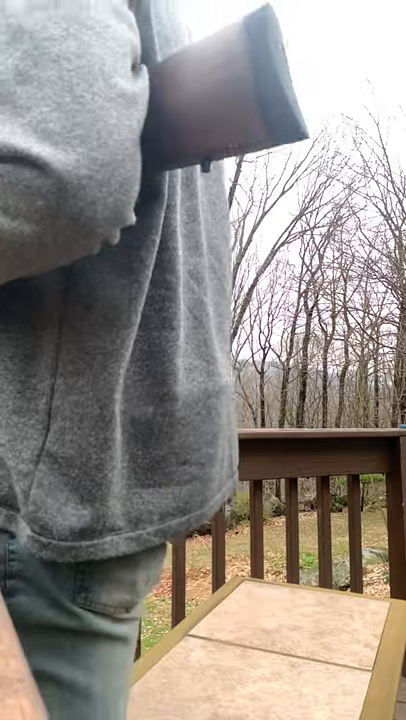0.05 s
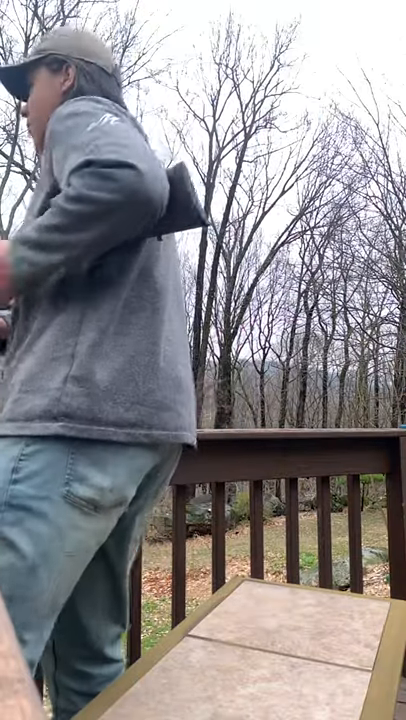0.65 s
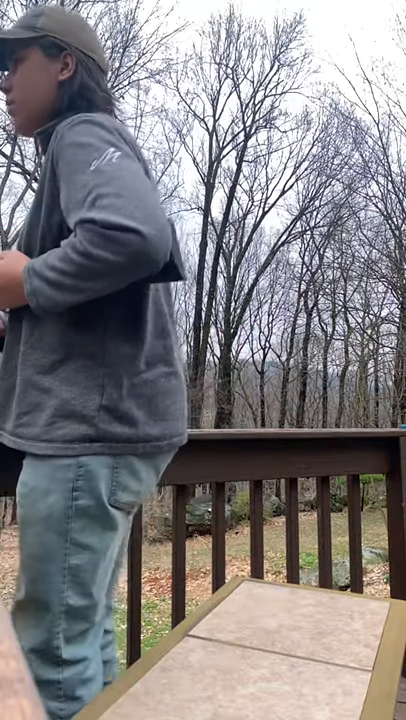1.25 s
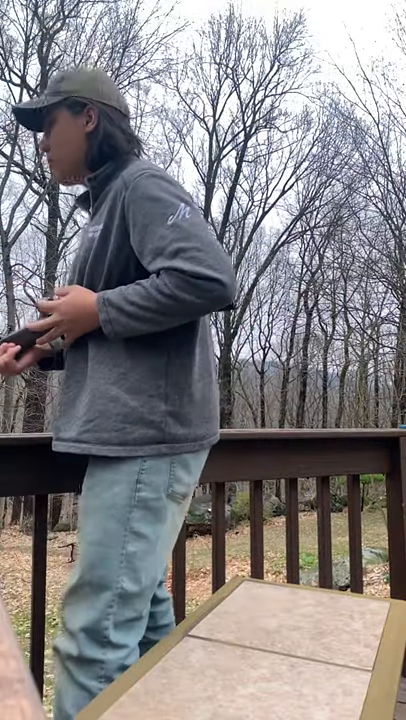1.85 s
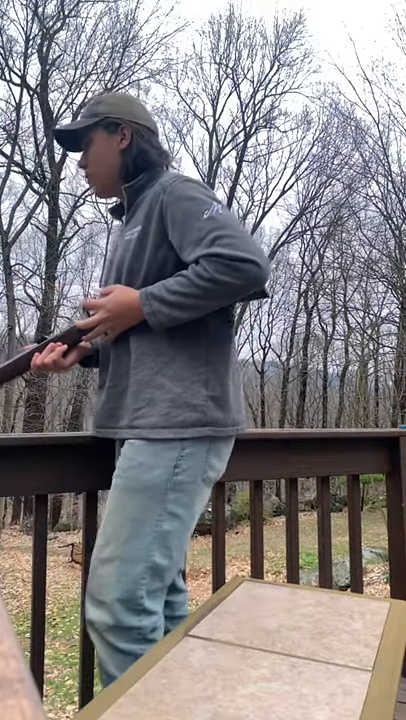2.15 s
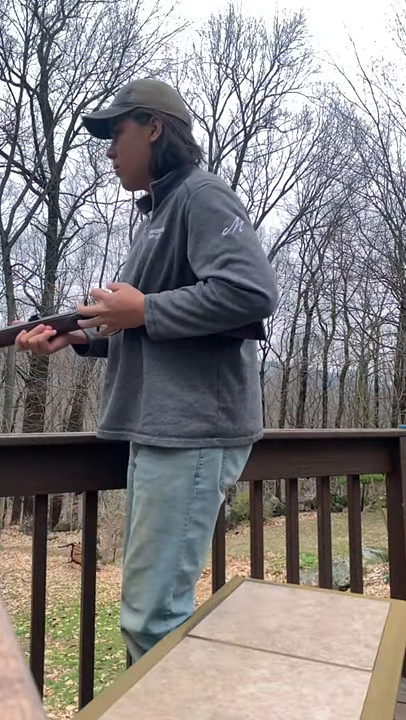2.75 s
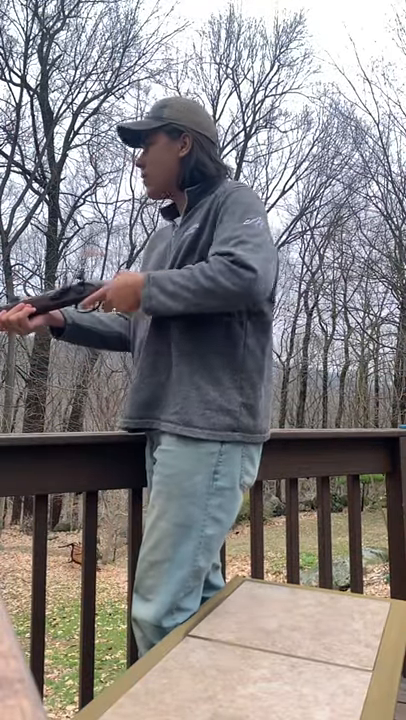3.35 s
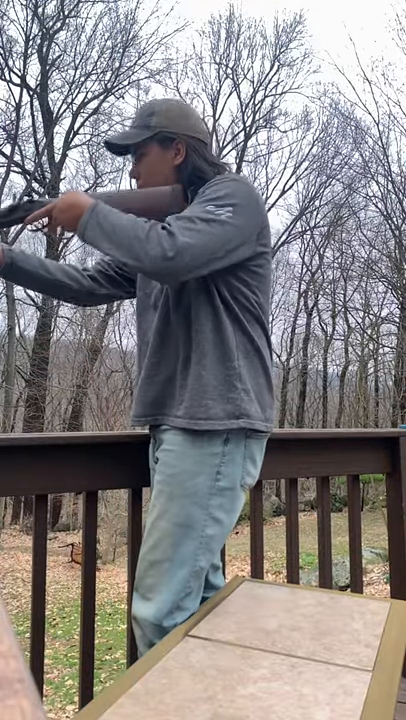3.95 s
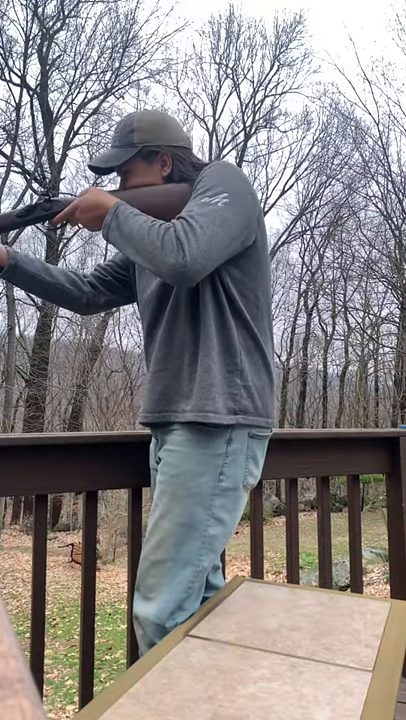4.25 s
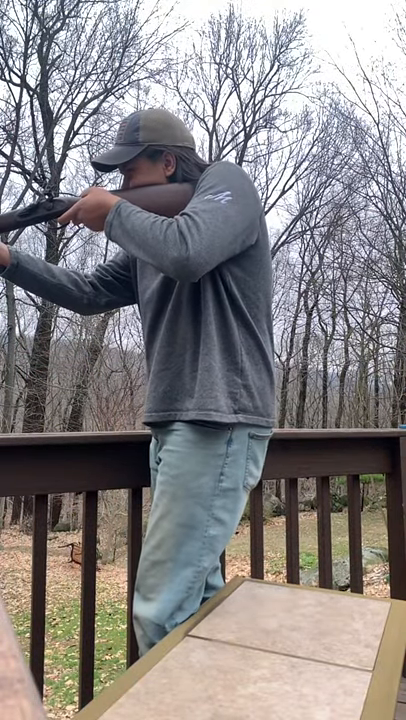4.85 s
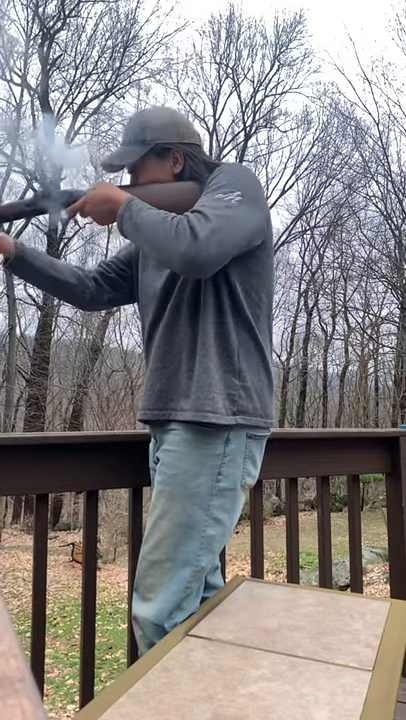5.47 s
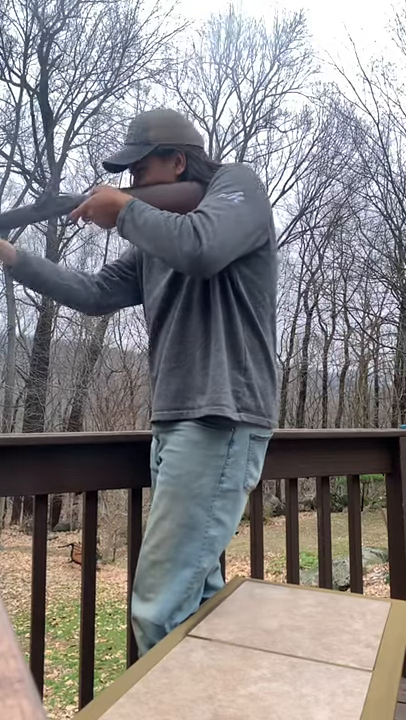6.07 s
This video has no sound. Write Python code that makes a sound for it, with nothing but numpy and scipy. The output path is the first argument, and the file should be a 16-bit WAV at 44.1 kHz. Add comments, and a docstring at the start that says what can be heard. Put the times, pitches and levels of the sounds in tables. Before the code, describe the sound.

A flintlock rifle is cocked and fired close by outdoors, its blast echoing off trees, after light wind and footsteps on boards.

```python
"""First, light wind thumps the microphone and steps cross a wooden deck, with cloth rubbing and a far hum.
Then a flintlock rifle clicks as it is cocked, slides into the shoulder and is fired close to a phone.
Flint strikes steel, a pinch of priming powder fizzes for a tenth of a second, gas roars from a small
hole in the barrel and the main charge bangs. The deck booms and bare woods scatter the shot back."""
import sys
import numpy as np
from scipy import signal
from scipy.fft import rfft, irfft, next_fast_len
from scipy.io import wavfile
from scipy.ndimage import uniform_filter1d, map_coordinates

SR = 44100
rng = np.random.default_rng(int(sys.argv[2]) if len(sys.argv) > 2 else 0)


def output_pcm(signal):
    """Save a mono or channel-first signal as 16-bit PCM at the path in sys.argv[1].

    Samples are clipped to [-1, 1] before scaling.
    """
    pcm = np.clip(np.atleast_2d(signal).T, -1, 1) * 32767
    wavfile.write(sys.argv[1], SR, np.round(pcm).astype(np.int16))


N = 273861
NOW = np.arange(N) / SR
HALF_SECOND = SR // 2
TOP_HZ = 15950  # where the treble ends


def amp(db):
    """Turn decibels into a number to multiply by."""
    return 10 ** (np.asarray(db) / 20)


def unit(x):
    """Scale x to an average strength (rms) of 1."""
    return x / np.sqrt(np.mean(x ** 2) + 1e-20)


def along(points, hz):
    """Read between (frequency [Hz], value) points, with octaves evenly spaced."""
    freqs, values = np.transpose(points)
    return np.interp(np.log(hz + 1), np.log(freqs + 1), values)


def wobble(rate):
    """A smooth curve through `rate` random values a second."""
    return map_coordinates(rng.standard_normal(int(N * rate / SR) + 4), [NOW * rate])


def swell(s, db, rise_s, fall_s, hold_s=0):
    """Loudness that climbs 20 dB per rise time to its level at s, holds, then drops 20 dB per fall time."""
    below = np.maximum((s - NOW) / rise_s, (NOW - s - hold_s) / fall_s)
    return amp(db - 20 * np.maximum(below, 0))


def burst(fade_s, attack_s):
    """Half a second of loudness that jumps up, then drops 60 dB per fade time."""
    t = NOW[:HALF_SECOND]
    return amp(-60 * t / fade_s) * (1 - np.exp(-t / attack_s))


def filtered(x, response):
    """Scale and shift each frequency in x by response(hz)."""
    n = x.shape[-1]
    padded = next_fast_len(n + SR // 5)
    return irfft(rfft(x, padded) * response(np.fft.rfftfreq(padded, 1 / SR)), padded)[..., :n]


def noise(colour, size=N, dull_db=0):
    """Two unrelated noises with the bass-to-treble balance `colour`, darkened by dull_db per octave."""
    def gain(hz):
        level_db = along(colour, hz) - dull_db * np.log2(1 + hz / 1000)
        return amp(level_db) / (1 + (hz / TOP_HZ) ** 80)
    return unit(filtered(rng.standard_normal((2, size)), gain))


def resonant(peaks, size=N):
    """Two unrelated noises coloured by the notes an object likes to ring at."""
    def body(hz):
        return sum((-1) ** k * amp(db) * 1j * hz * width / (pitch ** 2 - hz ** 2 + 1j * hz * width)
                   for k, (pitch, width, db) in enumerate(peaks))
    return unit(filtered(rng.standard_normal((2, size)), body))


def ring(notes, attack_s):
    """A pair of signals made of fading notes, a little different at every hit."""
    out = np.zeros((2, HALF_SECOND))
    for hz, db, fade_s in notes:
        strength = amp(db + rng.normal(0, 1.5))
        tone = np.sin(2 * np.pi * (hz * NOW[:HALF_SECOND] + rng.random((2, 1))))
        out += strength * burst(fade_s, attack_s) * tone
    return out


def patchy(x, depth_db):
    """Give x drifting louder and softer patches across time and pitch; the top hiss stays smoother."""
    hz, _, spectrum = signal.stft(x, SR, nperseg=1024)
    patches = uniform_filter1d(rng.standard_normal(spectrum.shape[1:]), size=6, axis=0)
    patches = unit(uniform_filter1d(patches, size=9, axis=1))
    depth = depth_db / (1 + (hz[:, None] / 9000) ** 2)
    return unit(signal.istft(spectrum * amp(depth * patches), nperseg=1024)[1][:, :N])


def add(track, s, sound):
    """Mix a sound into a track at time s."""
    part = track[:, round(s * SR):][:, :sound.shape[-1]]
    part += sound[..., :part.shape[1]]


def stereo(pair, likeness):
    """Two close microphones: row 0 is what they share, row 1 how they differ; treble falls out of step."""
    def shares(hz):
        turn = np.arccos(np.clip(along(likeness, hz), -1, 1)) / 2
        return np.array([np.cos(turn), np.sin(turn)])
    def phase_shift(hz):
        gap = 2 * np.pi * np.maximum(0, hz - 2680) / 4190
        return np.exp(.5j * np.array([gap, -gap]))
    common, apart = filtered(pair, shares)
    return filtered(np.array([common + apart, common - apart]), phase_shift)


# open air with distant traffic: (frequency [Hz], level [dB])
AIR_COLOUR = [(20, -17), (60, -3), (110, -0.5), (220, -13), (400, -18.3), (800, -23.5), (1400, -27),
              (1900, -34), (2600, -47), (4500, -47), (7000, -47.5), (11000, -43), (15500, -47)]
# a far machine drifts louder and softer: (time [s], level [dB])
DRONE_LEVELS = [(.3, -49), (2.7, -52), (4.6, -47.5), (5.3, -50)]
# a faint whine comes and goes: (time [s], level [dB], hold [s])
WHINE_SPELLS = [(1.298, -65.5, .55), (4.25, -73, 0.98)]
def outdoors(drone_hz=145.3, whine_hz=1055):
    """Distant traffic, the drone of a far machine and a thin whine."""
    air = amp(-54 + 0.89 * wobble(2.9)) * patchy(noise(AIR_COLOUR), depth_db=2.7)
    phase = 2 * np.pi * drone_hz * NOW + 0.67 * wobble(12)
    drone_db = np.interp(NOW, *np.transpose(DRONE_LEVELS)) + 2 * wobble(7)
    drone = amp(drone_db) * np.sin(phase)
    spells = sum(swell(s, db, rise_s=1.3, fall_s=1.3, hold_s=hold) for s, db, hold in WHINE_SPELLS)
    whine = spells * np.sin(2 * np.pi * whine_hz * NOW + 0.907 * wobble(45))
    return air + np.array([drone + whine, np.zeros(N)])


# small swirls of air that thump the microphone: (time [s], level [dB], pitch [Hz])
SWIRLS = [(0.15, -32.5, 75), (0.197, -25, 50), (0.227, -27, 63.5), (.334, -25, 52.4), (0.44, -24.5, 72.4),
          (.528, -23, 61.6), (0.58, -17.5, 61.5), (1.203, -26.5, 69.5), (1.294, -31, 63.7),
          (1.324, -29, 65.6), (2.941, -30.5, 51), (3.094, -33, 59), (3.507, -30, 50.7),
          (3.571, -27.5, 60.04), (5.278, -38, 64.7)]
def wind(breeze_db=-58):
    """Air flutters on the microphone; each swirl is one swing of pressure amid stronger flutter."""
    wakes = [swell(s, db - 13.5, rise_s=0.19, fall_s=0.055) for s, db, hz in SWIRLS]
    flutter = np.hypot(amp(breeze_db), np.linalg.norm(wakes, axis=0))
    rumble = noise([(15, -13), (40, -4.5), (70, 0), (110, -7), (200, -19.5), (500, -37), (2000, -79.5)])
    out = flutter * rumble
    for s, db, hz in SWIRLS:
        cycles = (NOW - s) * hz
        near = np.abs(cycles) < 2
        out[0, near] += amp(db) * np.sin(2 * np.pi * cycles[near]) * np.exp(-(cycles[near] / 0.77) ** 2)
    return out


# rubs of the sleeve and of the trouser legs: (time [s], level [dB], rise [s])
SLEEVE_RUBS = [(.42, -72, 0.76), (.72, -72.5, .12), (1.25, -69, .25), (2.05, -42.5, 0.038),
               (2.208, -45, .05), (2.31, -65.5, 0.091), (2.5, -67.5, .07), (2.99, -64, 0.14),
               (3.55, -72.5, .6)]
LEG_RUBS = [(.07, -60.5, .09), (.31, -62.5, .1), (.48, -63.5, .1)]
# fleece, denim and the rifle butt sliding on the shoulder: (frequency [Hz], level [dB])
FLEECE_COLOUR = [(200, -31), (900, -7), (2000, -8), (3500, -10.5), (6000, -13), (9000, -14), (12000, -11),
                 (15500, -12.5)]
DENIM_COLOUR = [(600, -2.5), (1500, -5.5), (3200, -6), (4800, -11.5), (6500, -10.5), (9000, -24),
                (15000, -11)]
BUTT_COLOUR = [(3000, -15.5), (5000, -22), (7000, -19), (9000, 2), (11000, -1), (15500, 0.5)]
def clothes(seated_s=4.03):
    """Cloth rubs in fine grains, one swell per movement; the butt rubs harder until it is seated."""
    def rubs(rows):
        return np.linalg.norm([swell(s, db, rise, fall_s=1.5 * rise) for s, db, rise in rows], axis=0)
    grain = unit(amp(2.8 * wobble(350)))
    sleeve = rubs(SLEEVE_RUBS) * patchy(noise(FLEECE_COLOUR), depth_db=5.5)
    shoulder = swell(seated_s, db=-56.5, rise_s=.14, fall_s=.05) * noise(BUTT_COLOUR)
    legs = rubs(LEG_RUBS) * noise(DENIM_COLOUR)
    return grain * (sleeve + legs + shoulder)


# shoes landing: (time [s], relative level [dB], scuff adjustment [dB], pitch [Hz])
FOOTFALLS = [(0.231, -33, -27, 500), (1.093, -28, -27, 560), (1.12, -41, -14, 415), (1.699, -37, -25, 520),
             (1.924, -55, 0, 1250), (2.011, -38, -15, 614), (2.038, -30, -3, 1150), (2.051, -32.5, -7, 700),
             (2.15, -30, -13, 808), (2.302, -36, -20, 420), (2.894, -35, -25, 480), (2.945, -52, 0, 1400),
             (3.219, -38.5, -32, 480)]
# a shoe sliding: (time [s], level [dB], rise [s], fall [s])
SHOE_SLIDES = [(1.932, -54.5, .024, .25), (2.046, -39, .035, 0.018), (2.168, -50, 0.016, .02),
               (2.212, -46.5, .03, .045)]
# a sole rubbing on wood: (frequency [Hz], level [dB])
SOLE_COLOUR = [(100, -37), (350, -15), (700, -2.5), (1300, 1), (1900, 0), (2600, -16.5), (5000, -36),
               (15000, -32)]
# notes of the boards and of the beams under them: (pitch [Hz], width [Hz], level [dB])
BOARD_NOTES = [(225, 67, -2.5), (412, 28, 2), (598, 74, 0.5), (802, 88, 0.5), (977, 310, -4),
               (1340, 160, -14)]
BEAM_NOTES = [(98, 17, 0), (204.6, 60, -16), (318, 70, -16.5), (475, 89, -24.5), (815, 56, -25)]
def feet():
    """Shoes knock, scuff and slide on the boards, which groan as the weight shifts."""
    out = np.zeros((2, N))
    for s, db, scuff_db, pitch in FOOTFALLS:
        # each spot on the deck favours some of the boards' notes
        near_pitch = lambda hz: amp(-6 * np.log2((hz + 1) / pitch) ** 2)
        boards = resonant(BOARD_NOTES, size=HALF_SECOND)
        knock = unit(filtered(boards, near_pitch)) * burst(fade_s=0.046, attack_s=0.002)
        tock = ring([(pitch, -5, .04)], attack_s=0.00055)
        low_notes = unit(filtered(boards, lambda hz: near_pitch(2 * hz)))
        boom = low_notes * burst(fade_s=0.26, attack_s=0.0054)
        scuff = noise(SOLE_COLOUR, size=HALF_SECOND) * burst(fade_s=0.05, attack_s=.001)
        add(out, s, amp(db - 1) * (knock + tock + amp(-14) * boom))
        add(out, s, amp(db + scuff_db + 3.5) * scuff)
    scrape = patchy(noise(SOLE_COLOUR), depth_db=4.5) * unit(amp(2 * wobble(260)))
    slide = sum(swell(*row) for row in SHOE_SLIDES) * scrape
    groan = swell(s=2.19, db=-46, rise_s=0.04, fall_s=.13, hold_s=0.18) * resonant(BEAM_NOTES)
    return out + slide + groan


# notes of the lock, the rifle's steel firing mechanism: (pitch [Hz], level [dB], fade [s])
STEEL_NOTES = [(725, -14.5, 0.054), (915, -9, 0.15), (1264, -8, 0.067), (2083, -4, 0.1), (2680, -6, 0.048),
               (3880, 3.5, .05), (4340, -7, .05), (4700, -8, 0.046), (6444, -5, 0.06), (6950, -5, 0.039),
               (9010, 1.5, 0.039), (9480, -10, 0.05), (10780, -11, .07), (11860, -14.5, .056),
               (12820, -9, .07), (14800, 0.5, .05)]
def lock_clicks(contacts, colour, ring_db, tail_db, tail_fade_s):
    """Each steel contact cracks and chatters, rings the lock and scatters off the deck and railing."""
    out = np.zeros((2, N))
    for s, db, fade_s in contacts:
        chatter = unit(amp(2.5 * wobble(900)))[:HALF_SECOND]
        crack = noise(colour, size=HALF_SECOND) * burst(fade_s, attack_s=0.00022) * chatter
        tail = noise(colour, size=HALF_SECOND, dull_db=5.0) * burst(tail_fade_s, attack_s=0.00543)
        steel = ring(STEEL_NOTES, attack_s=0.00044)
        add(out, s, amp(db + 2.5) * (crack + amp(ring_db) * steel + amp(tail_db) * tail))
    return out


# clicks of cocking and raising the rifle: (time [s], relative level [dB], fade [s])
COCKING_CLICKS = [(2.778, -50, 0.04), (2.7843, -19.5, 0.045), (2.789, -19, 0.066), (2.7965, -24, 0.035),
                  (2.8062, -26, 0.028), (2.8146, -21.5, 0.018), (2.8846, -52, 0.049), (2.946, -60, 0.027),
                  (3.926, -62, 0.025), (4.16, -64.5, .02)]
# their tone: (frequency [Hz], level [dB])
COCKING_COLOUR = [(200, -27), (520, -30), (700, -3), (880, 0), (1100, -12), (2500, -9.5), (3900, -8),
                  (4600, 0), (5500, -5), (6600, -1), (7600, -8.5), (9200, 2), (11000, -5), (15500, -7)]
def cocking():
    """A catch rides into its notch to hold the hammer back; the lock then ticks as the rifle is raised."""
    return lock_clicks(COCKING_CLICKS, COCKING_COLOUR, ring_db=-21, tail_db=-23, tail_fade_s=0.1898)


# clicks of firing, from trigger to hammer stop: (time [s], relative level [dB], fade [s])
STRIKE_CLICKS = [(5.266, -49, 0.022), (5.2965, -24.5, 0.05), (5.3025, -10, 0.033), (5.3088, -11, 0.025),
                 (5.321, -15.5, 0.02)]
# their tone: (frequency [Hz], level [dB])
STRIKE_COLOUR = [(200, -26.5), (400, -20.5), (650, -7), (1300, -3), (2200, -4), (3200, -8), (4400, -2.5),
                 (5500, -9.5), (7000, -14.5), (9000, -0.5), (12000, -8), (14300, -1.5), (15800, -11)]
def flint_strike():
    """The trigger ticks, flint scrapes a steel lid, the lid flies open and the hammer hits its stop."""
    return lock_clicks(STRIKE_CLICKS, STRIKE_COLOUR, ring_db=-22, tail_db=-31.5, tail_fade_s=0.16)


# the fizzing powder and the jet of gas: (frequency [Hz], level [dB])
FIZZ_COLOUR = [(200, -7), (700, 0.5), (1500, 1.5), (3000, -2.5), (6000, -5.5), (15000, -9.5)]
JET_COLOUR = [(100, -20), (300, -3), (650, -13), (1400, -3), (2000, -11), (2600, -10.5), (3200, 2),
              (3800, -13), (5500, -18.5), (7000, -15.5), (9000, -27.5), (15500, -29)]
# whistles in the jet: (pitch [Hz], width [Hz], level [dB])
JET_WHISTLES = [(350, 40, -8), (611, 49, -0.5), (736, 43, -3), (1230, 61, -2.5), (1457, 38, -4),
                (2188, 27, -5), (3224, 29, 2), (4210, 110, -0.5), (6500, 160, -13.5), (7000, 40, -10)]
def powder(jet_lead_s=.0165):
    """The flint lights the priming powder; just before the bang, gas jets from the barrel's side hole."""
    sparked_s = STRIKE_CLICKS[1][0]
    caught_s = BLAST_ARRIVALS[1][0] - jet_lead_s
    burn = swell(sparked_s, db=-37, rise_s=0.011, fall_s=.2) * (NOW < caught_s)
    fizz = burn * unit(amp(2.4 * wobble(540))) * noise(FIZZ_COLOUR)
    spurt = swell(caught_s, db=-11.5, rise_s=.0055, fall_s=.011, hold_s=.011)
    emptying = swell(caught_s, db=-33.5, rise_s=.0055, fall_s=0.089)
    jet = amp(-2) * noise(JET_COLOUR) + resonant(JET_WHISTLES)
    return fizz + (spurt + emptying) * jet * unit(amp(1.1 * wobble(600)))


# the echo from trunks, and the bright early one from railing and twigs: (frequency [Hz], level [dB])
TRUNK_ECHO_COLOUR = [(25, -25), (80, -3), (160, -5.5), (320, 0.5), (700, -5), (1400, -4.5), (2200, -13),
                     (4000, -17), (7000, -21), (11000, -27), (15500, -39)]
TWIG_ECHO_COLOUR = [(800, -19), (2500, -7), (6000, -2), (11000, -9), (15500, -10.5)]
def woods(rise_s=.18, hold_s=.135, fade_db_per_s=29):
    """The echo swells as the shot reaches more trunks; the later it returns, the more treble is lost."""
    fired_s = BLAST_ARRIVALS[1][0]
    hz, t, spectrum = signal.stft(noise(TRUNK_ECHO_COLOUR), SR, nperseg=256)
    late_s = np.maximum(t - fired_s - .27, 0)  # the nearest trees answer with the full treble
    air_loss_db = 52 * late_s * (hz[:, None] / 10000) ** 1.93
    scatter = signal.istft(spectrum * amp(-air_loss_db), SR, nperseg=256)[1][:, :N]
    flicker = unit(amp(0.89 * wobble(220) + 0.43 * wobble(35)))
    age = NOW - fired_s
    reached = np.clip(age / rise_s, 0, 1) ** 1.3
    roll = reached * amp(-28.5 - fade_db_per_s * np.maximum(age - rise_s - hold_s, 0))
    twigs = swell(fired_s + .1, db=-41, rise_s=.2, fall_s=.08, hold_s=.07) * (age > 0)
    return flicker * (roll * scatter + twigs * noise(TWIG_ECHO_COLOUR))


# the ball leaves, then the blast follows and bounces back from ground and house:
# (time [s], relative roar level [dB], push level [dB], dulling [dB per octave], fade [s])
BLAST_ARRIVALS = [(5.4156, -10, -25.5, -9, 0.056), (5.421, -7, -9.5, 3.3, 0.1),
                  (5.441, -26, -12.5, 0, 0.23), (5.4541, -18, -18, 0, 0.075), (5.4595, -17, -13.5, 6, 0.1)]
# the tone of the roar: (frequency [Hz], level [dB])
ROAR_COLOUR = [(25, -14), (80, -5.5), (200, -3), (450, -3.5), (900, -12), (1400, -4.5), (2200, -11.5),
               (3200, -12.5), (5000, -9), (7000, -15), (11000, -16.5), (15500, -21)]
# notes of the deck shaken by the blast: (pitch [Hz], level [dB], fade [s])
DECK_NOTES = [(82, -1, 0.29), (142.5, -2, 0.172), (177.5, -2, 0.23), (211.6, -1, 0.35), (253, -6, 0.26),
              (284, -3, 0.17), (352, -12, .2), (430, -12, 0.12), (596, -9.5, 0.19), (680, -10.5, 0.12),
              (742, -7, 0.082)]
def muzzle_blast(push_s=.0015):
    """Each arrival is a push of air with suction after it and a churning roar; the deck booms along."""
    out = np.zeros((2, N))
    age = NOW[:HALF_SECOND] / push_s
    push = (1 - age) * np.exp(-age) * (1 - np.exp(-8 * age))
    for s, roar_db, push_db, dull_db, fade_s in BLAST_ARRIVALS:
        roar = noise(ROAR_COLOUR, size=HALF_SECOND, dull_db=dull_db) * burst(fade_s, attack_s=0.00086)
        add(out, s, amp(roar_db - 0.5) * roar)
        add(out[:1], s, -amp(push_db) * push)
        add(out, s, amp(push_db - 17.5) * ring(DECK_NOTES, attack_s=0.0017))
    return out


# how alike left and right are for near and far sounds: (frequency [Hz], likeness [0-1])
NEAR_LIKENESS = [(100, 0.87), (300, .7), (600, 0.2), (1300, 0.4), (3000, .3), (4500, 1), (7000, 0.9),
                 (14000, 1)]
FAR_LIKENESS = [(60, 1), (130, 1), (290, 0.49), (640, 0.21), (1400, 0.39), (3000, 0.3743), (4700, 1),
                (9000, 1), (14000, 0.95)]
def scene():
    """The shooter and rifle are near; the background and the woods, a little to the left, are far."""
    clicks = cocking() + flint_strike()
    near = stereo(wind() + feet() + clothes() + clicks + powder() + muzzle_blast(), NEAR_LIKENESS)
    background = stereo(outdoors(), FAR_LIKENESS)
    echo = amp([[.9], [-.8]]) * stereo(woods(), FAR_LIKENESS)
    return near + background + echo


def record(dry):
    """The phone cuts the deepest bass, rounds off the loudest peaks and drops the very highest treble."""
    thinned = filtered(dry, lambda hz: (1j * hz / (20 + 1j * hz)) ** 2)
    rounded = thinned / (1 + np.abs(thinned / .85) ** 6) ** (1 / 6)
    return filtered(rounded, lambda hz: np.clip((TOP_HZ + 350 - hz) / 700, 0, 1) ** 2)


dry = scene()
out = record(dry)
output_pcm(out)
```